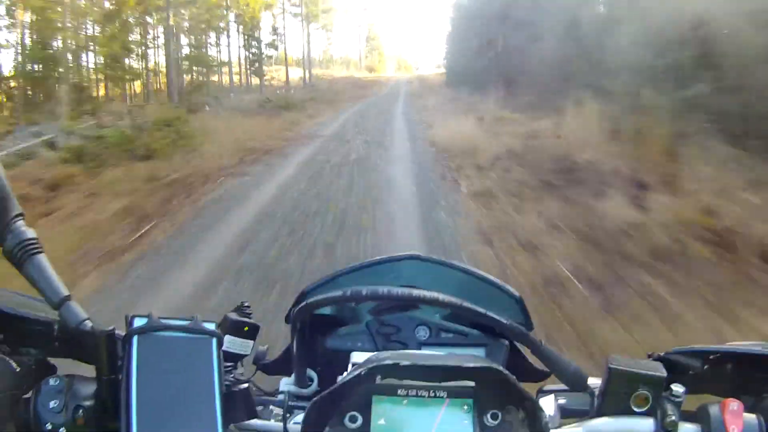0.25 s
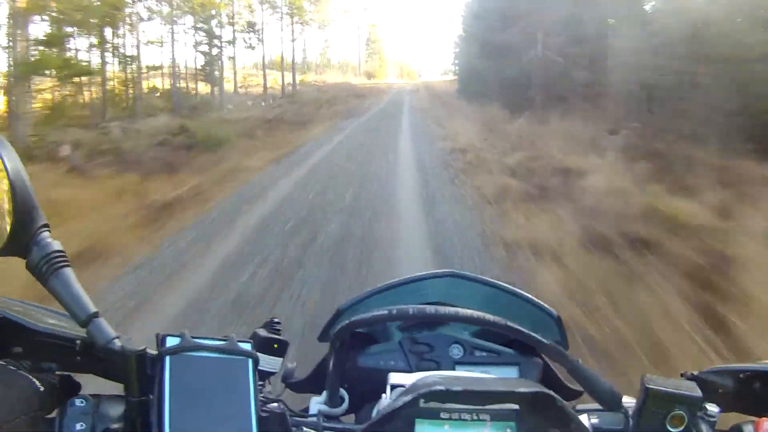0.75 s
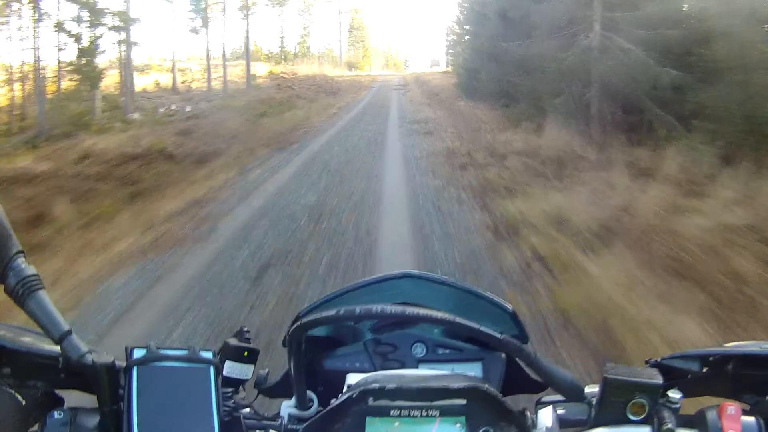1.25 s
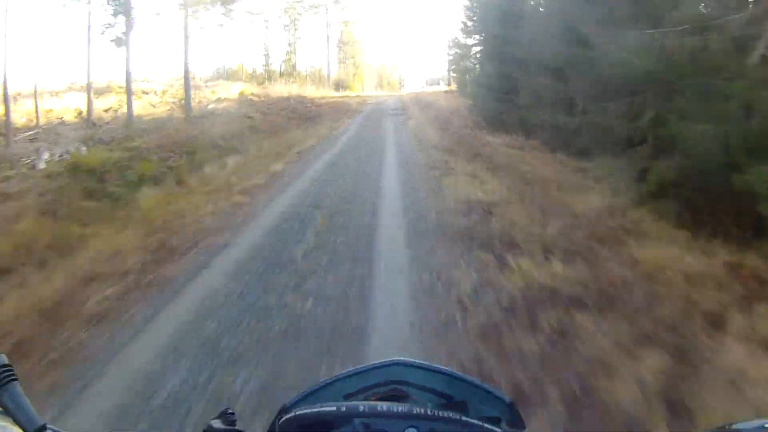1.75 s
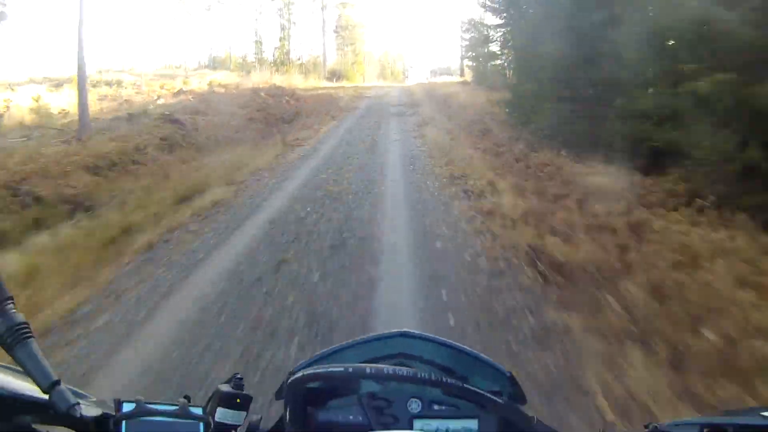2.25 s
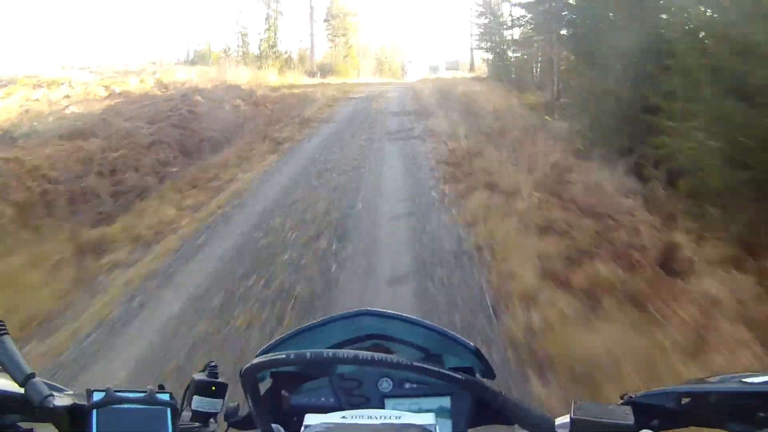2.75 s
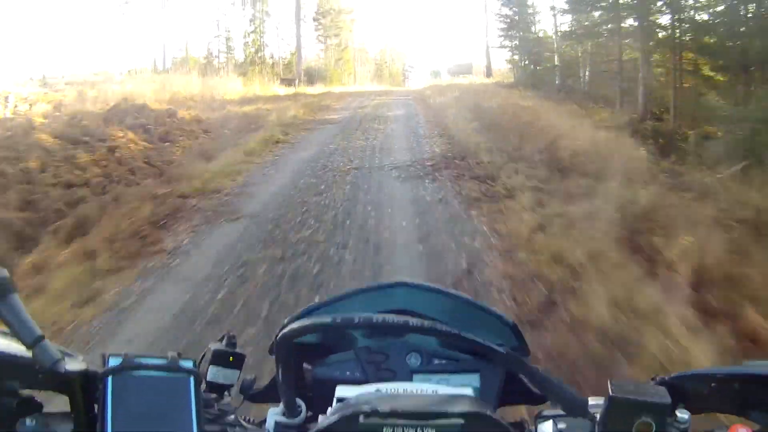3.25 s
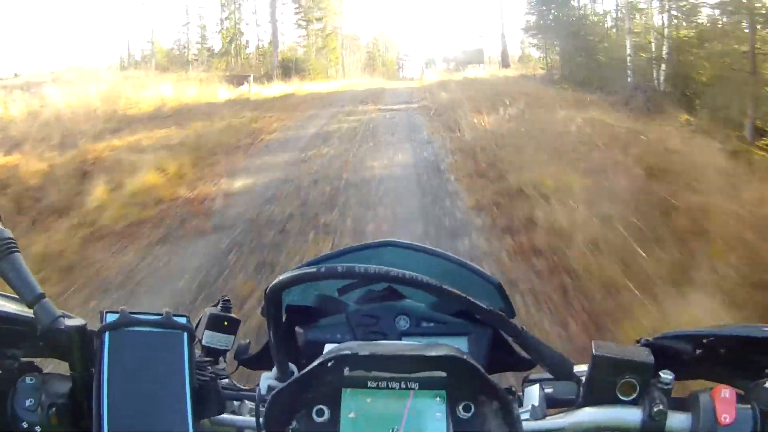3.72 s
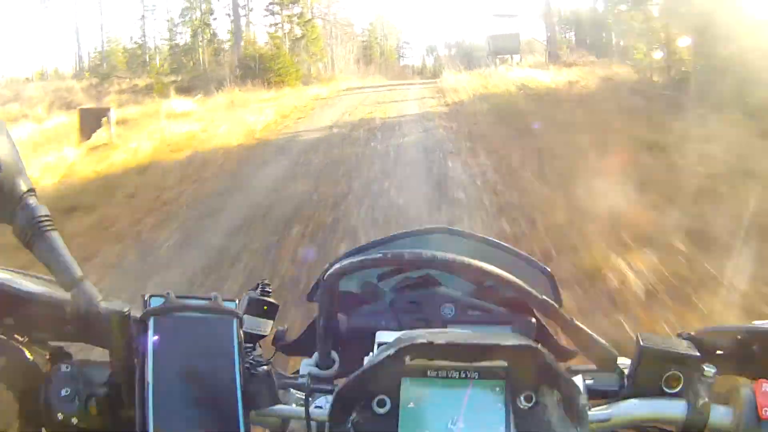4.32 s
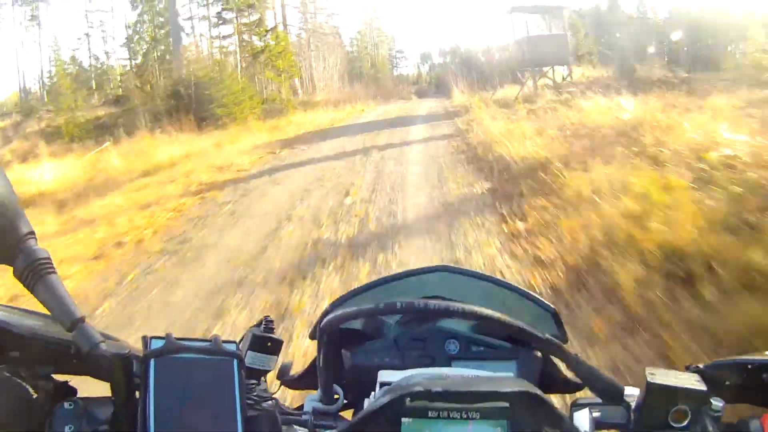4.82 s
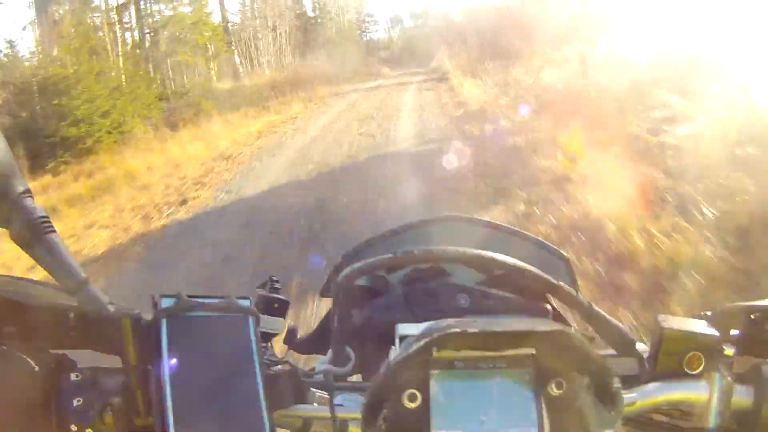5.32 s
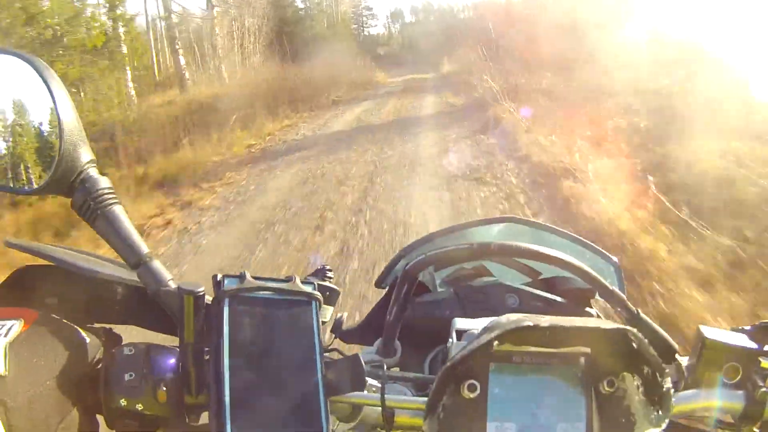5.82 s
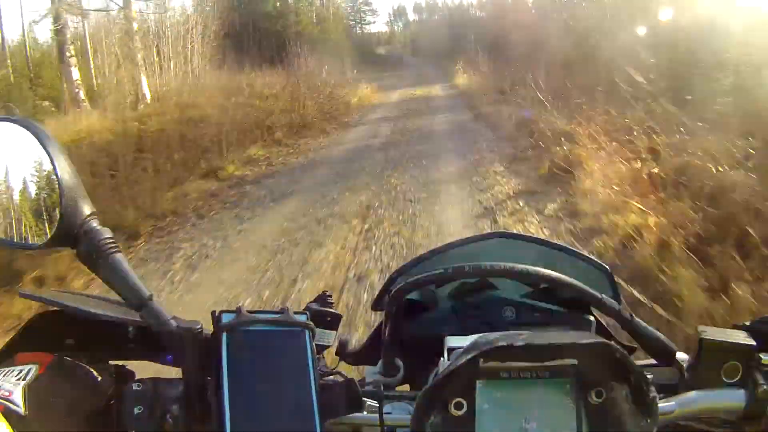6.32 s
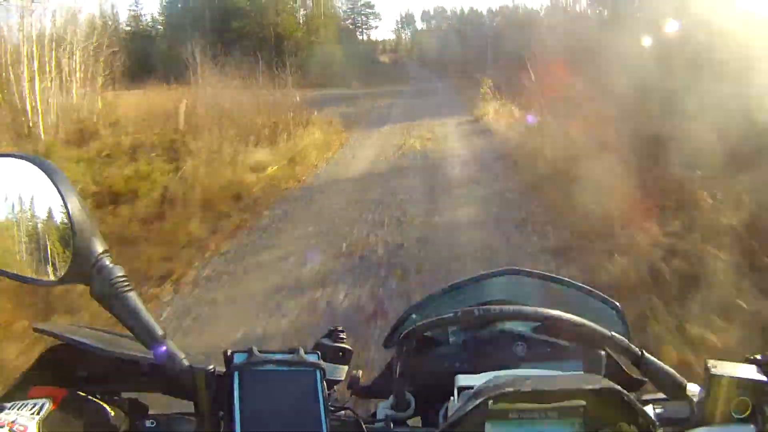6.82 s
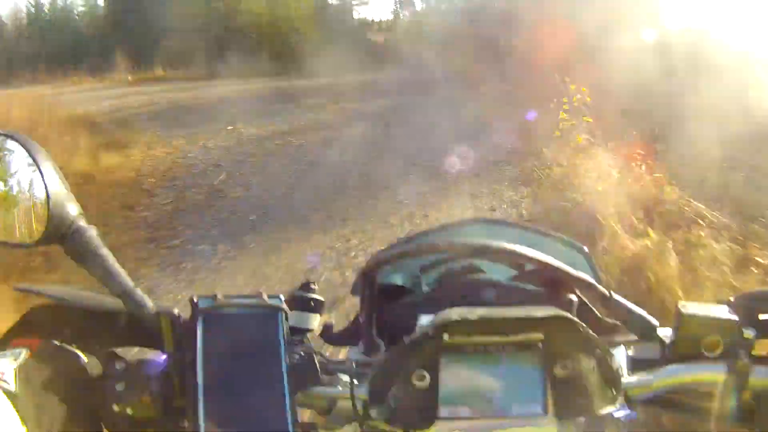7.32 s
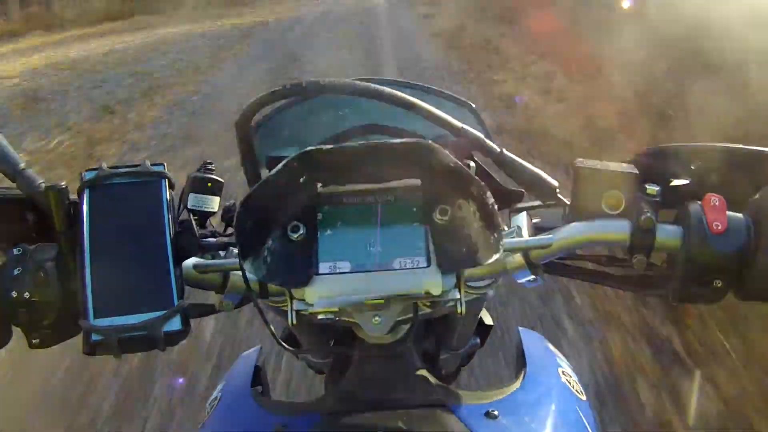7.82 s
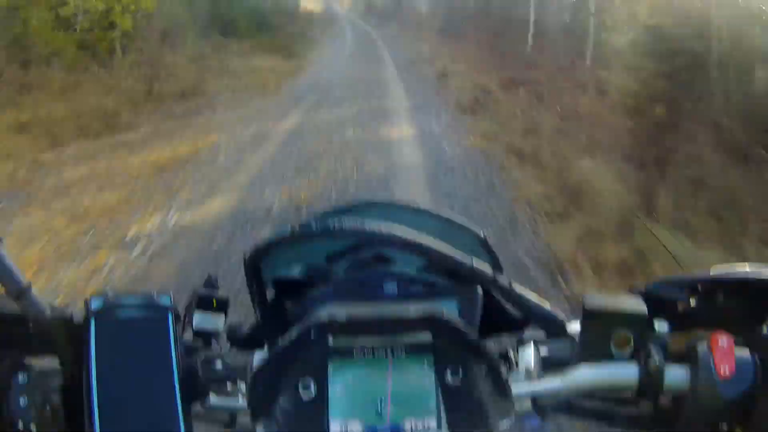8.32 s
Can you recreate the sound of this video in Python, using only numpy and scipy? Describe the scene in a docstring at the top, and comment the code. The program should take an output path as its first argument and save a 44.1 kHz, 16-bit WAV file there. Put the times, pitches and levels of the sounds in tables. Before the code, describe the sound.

A single-cylinder motorcycle thumps and clatters along a gravel track while wind buffets the microphone and a few sharp plastic clicks break through.

```python
"""A single-cylinder motorcycle thumps and clatters along a gravel forest road while wind buffets a plastic case.
The case holds a camera on the rider; its resonances hollow most sources, and a few sharp clicks strike it.
Exhaust pulses, crank hum, gated clatter and drive whine all follow one crank phase.
Wind, tyres and hiss are shaped noise; grit is random impulses.
Thuds are low wavering tones that swell and fade; clicks are decaying rings with noise cracks."""
import sys
import numpy as np
from scipy import signal
from scipy.fft import rfft, irfft
from scipy.io import wavfile
from scipy.ndimage import uniform_filter1d

SR = 44100
rng = np.random.default_rng(int(sys.argv[2]) if len(sys.argv) > 2 else 0)


def unload_audio(sound):
    """Save the sound as a 16-bit wav file, at the path given as the first command line argument."""
    columns = np.transpose(np.atleast_2d(sound))
    # keep every value between -1 and 1, then stretch to whole-number steps
    steps = np.round(np.clip(columns, -1, 1) * 32767)
    wavfile.write(sys.argv[1], SR, steps.astype(np.int16))


N = 377496
TIME = np.arange(N) / SR  # s
FREQ = np.fft.rfftfreq(N, 1 / SR) + 1e-3  # Hz, kept above zero for the logarithms


def undb(db):
    """Decibels to gain."""
    return 10 ** (np.asarray(db) / 20)


def unit(x):
    """Scale to rms 1."""
    return x / np.sqrt(np.mean(x ** 2))


def curve(table):
    """Interpolate (start_s, value) points, sample by sample."""
    return np.interp(TIME, *np.transpose(table))


def walk(rate_hz):
    """Low-passed random motion with spread 1."""
    lowpass = np.exp(-(FREQ / rate_hz) ** 2)
    return unit(irfft(rfft(rng.standard_normal(N)) * lowpass, N))


def grains(per_second, spread_db):
    """Random impacts of either sign, mostly small and a few large."""
    hit = rng.random(N) < per_second / SR
    size = np.minimum(rng.exponential(size=N), 5)
    sign = np.sign(rng.standard_normal(N))
    return unit(hit * undb(spread_db * size) * sign)


# resonances of the plastic case: centre_hz, width_hz, lift_db
CASE_RESONANCES = [(443, 53, 8.5), (603.5, 47, 9), (853, 63, 5), (1525, 157, 6.5), (2207, 386, 8),
                   (2537, 253, 7), (3424, 59, 5), (4385, 170, 3), (5885, 220, 4), (7840, 320, 4.5),
                   (9840, 220, 4)]


def through_case(x, spectrum):
    """Source spectrum plus case resonances, as a minimum-phase filter so that knocks ring afterwards."""
    hz, db = np.transpose(spectrum)
    response_db = np.interp(np.log(FREQ), np.log(hz), db)
    # 10 dB per octave fall above the last point
    response_db = response_db - 10 * np.log2(np.maximum(FREQ / hz[-1], 1))
    for centre_hz, width_hz, lift_db in CASE_RESONANCES:
        response_db = response_db + lift_db / (1 + (2 * (FREQ - centre_hz) / width_hz) ** 2)
    # folded cepstrum gives the minimum phase
    cepstrum = irfft(np.log(undb(response_db)), N)
    cepstrum[1:N // 2] *= 2
    cepstrum[N // 2 + 1:] = 0
    return irfft(rfft(x) * np.exp(rfft(cepstrum)), N)


def eddies(spectrum):
    """Turbulent air on the case: noise held at an even level, so that the flow and gust curves set its swells."""
    air = through_case(rng.standard_normal(N), spectrum)
    return air / np.sqrt(uniform_filter1d(air ** 2, size=5000))


# high hiss shape, before the case: freq_hz, density_db
HISS_SPECTRUM = [(3000, -8), (7000, -6), (8600, 4), (10100, 0.5), (11500, 0), (13000, 0.5), (16000, -4)]


def air_hiss(hiss_db=-59.5, follow_db_per_db=0.4):
    """Faint high noise, a little stronger where the gravel is louder."""
    gravel_db = curve(GRAVEL_LEVEL)
    level_db = hiss_db + follow_db_per_db * (gravel_db - gravel_db.mean())
    return unit(through_case(rng.standard_normal(N), HISS_SPECTRUM)) * undb(level_db)


# wind shapes, before the case: freq_hz, density_db
BUFFET_SPECTRUM = [(60, -29), (150, -12.5), (185, -8.5), (220, -1), (268, 0), (310, -10), (400, -19),
                   (520, -32), (900, -55)]
RUMBLE_SPECTRUM = [(15, -31), (27, -5), (48, -3), (66, -9), (84, -6.5), (102, 3.5), (135, -2.5),
                   (175, -6.5), (260, -22), (600, -50.5)]
RUSH_SPECTRUM = [(250, -9), (450, -4.5), (800, 2.5), (1050, -2.5), (1300, -8.5), (2000, -15.5), (3000, -19),
                 (8000, -54)]
# air stream strength re cruising: start_s, flow_db
AIRFLOW_LEVEL = [(0, 1.1), (1.85, 1.5), (2.1, -1.1), (2.75, -4.5), (3.45, -2.1), (4.05, -2.5), (4.9, -1),
                 (5.3, 3), (5.55, 2.5), (5.75, -0.5), (7.2, 0), (7.7, 4.5), (8.1, 1), (8.56, 2)]
# strongest gusts, lifting the buffeting: peak_s, lift_db
GUST_PEAKS = [(3.38, 4), (4.48, 4.5), (5.93, 2.5), (6.221, 3.5), (6.95, 4.5), (8.41, 5)]
GUST_S = 0.057  # time to swell, and to die away
SWELL_HZ, SWELL_DB = 3.8, 0.24  # lesser gusts, at random
RUSH_POWER = 1.45  # exponent of road speed


def wind(buffet_db=-26.0, rumble_db=-30.5, rush_db=-38.0, rumble_follow=.5, rush_follow=0.45,
         rush_load=0.068, flutter_db=1.0, surge_db=1.0):
    """Air stream buffets the case, rumbles and rushes round it; all grow with the flow and flutter together."""
    flow_db = curve(AIRFLOW_LEVEL)
    gust_db = SWELL_DB * walk(SWELL_HZ)
    for peak_s, lift_db in GUST_PEAKS:
        gust_db = gust_db + lift_db * np.exp(-((TIME - peak_s) / GUST_S) ** 2)
    buffet = eddies(BUFFET_SPECTRUM) * undb(buffet_db + flow_db + gust_db)
    surge = surge_db * walk(SWELL_HZ)
    rumble = eddies(RUMBLE_SPECTRUM) * undb(rumble_db + rumble_follow * flow_db + surge)
    # the rush also rises with road speed and with the air that the engine draws
    crank_hz = curve(CRANK_SPEED)
    speed = crank_hz / crank_hz.mean()
    rush_level_db = rush_db + rush_follow * flow_db + rush_load * curve(ENGINE_LOAD)
    rush = eddies(RUSH_SPECTRUM) * speed ** RUSH_POWER * undb(rush_level_db)
    return (buffet + rumble + rush) * undb(flutter_db * walk(26))


# low wind thuds: peak_s, level_db, pitch_hz (mean), length_s (to 1/e each side)
WIND_THUDS = [(0.275, -29, 100, .07), (1.376, -21.5, 104.7, 0.048), (1.898, -29.5, 180.7, 0.16),
              (3.87, -31, 88, 0.11), (4.86, -32.5, 100.2, 0.059), (7.419, -28, 85.1, 0.17),
              (7.684, -25, 90, 0.044), (7.864, -27, 160, 0.36), (8.236, -27, 62, 0.039)]


def thuds():
    """Big single eddies push the case: low tones of wavering pitch that swell and fade."""
    total = np.zeros(N)
    for peak_s, level_db, pitch_hz, length_s in WIND_THUDS:
        swell = np.exp(-((TIME - peak_s) / length_s) ** 2)
        wavering_hz = pitch_hz * (1 + 0.1163 * walk(34.5))
        tone = np.sqrt(2) * np.sin(2 * np.pi * np.cumsum(wavering_hz) / SR)
        total += undb(level_db) * swell * tone
    return total


# tyre noise and stone shapes, before the case: freq_hz, density_db
TYRE_SPECTRUM = [(1000, -16), (2200, -2), (2700, -3), (3100, -14.5), (3800, -8.5), (4400, 3), (5200, 0),
                 (6100, -2.5), (6800, -11), (8500, -28.5), (10500, -20), (11500, -34)]
GRIT_SPECTRUM = [(1000, -12.5), (2300, -3.5), (3100, -11), (4500, 0.5), (6000, -4), (7500, -16),
                 (11000, -38)]
# tyre level as the gravel changes, before trim_db: start_s, level_db
GRAVEL_LEVEL = [(0, -37.5), (1.1, -36), (1.28, -39.5), (1.75, -38), (2.15, -39.5), (2.45, -43), (2.56, -40),
                (3.55, -37.5), (3.9, -40), (5, -39), (7.7, -37), (8.56, -37)]


def tyres(trim_db=1, grit_db=-9, bumps_db=0.98):
    """Knobbly tyres grind the gravel: dense hiss with single stones ticking in it."""
    grind = unit(through_case(rng.standard_normal(N), TYRE_SPECTRUM))
    stones = unit(through_case(grains(900, 3.5), GRIT_SPECTRUM)) * undb(grit_db)
    return (grind + stones) * undb(curve(GRAVEL_LEVEL) + trim_db + bumps_db * walk(57))


# crack shape, before the case: freq_hz, density_db
CRACK_SPECTRUM = [(1000, -18), (3500, -12), (4700, 0), (6000, -4), (7500, -14), (12000, -20), (16000, -28)]
# taps: start_s, level_db (ring peak), pitch_hz, decay_s, crack_share (before crack_db), snap_share
CASE_CLICKS = [(3.620, -34, 5000, .003, .5, .05), (6.3214, -30, 5200, .002, .6, .02),
               (6.3315, -21, 5000, .0018, .6, .02), (6.3365, -24, 5600, .003, .7, .02),
               (6.3482, -11.5, 4950, .0017, .5, .025), (6.3507, -20, 4700, .0015, .8, .04),
               (7.6207, -11.5, 4500, .0012, .45, .17)]


def clicks(crack_db=8):
    """Hard taps on the plastic: a decaying ring with white snap, plus a noise crack through the case."""
    direct, cracks = np.zeros(N), np.zeros(N)
    t = TIME[:SR // 20]
    for start_s, level_db, pitch_hz, decay_s, crack_share, snap_share in CASE_CLICKS:
        start = int(start_s * SR)
        span = slice(start, start + len(t))
        fade = undb(level_db) * np.exp(-t / decay_s)
        ring = np.sin(2 * np.pi * pitch_hz * t)
        snap = snap_share * rng.standard_normal(len(t))
        direct[span] += fade * (ring + snap)
        cracks[span] += fade * crack_share * rng.standard_normal(len(t))
    return direct + undb(crack_db) * through_case(cracks, CRACK_SPECTRUM)


# crank speed: start_s, crank_hz (turns per second)
CRANK_SPEED = [(.9, 56.3), (1.35, 53.4), (2.35, 50.1), (3.55, 52.08), (4.3, 50.1), (5.2, 49), (5.8, 49.3),
               (6.5, 51.02), (8.56, 53.35)]
# throttle, eased off twice and then opened: start_s, load_db (re cruising)
ENGINE_LOAD = [(.9, 1), (1.3, -3), (2.3, -3), (2.65, -14), (3.2, -7), (3.55, 2), (3.8, -9.5), (4.25, -6),
               (4.5, 0.5), (7.25, 3), (7.6, 7), (8.3, 6.5), (8.56, -1.5)]
# crank hum: start_s, level_db
HUM_LEVEL = [(.9, -52), (1.35, -32), (1.8, -45), (2.15, -31), (2.8, -39.5), (4.4, -36), (6, -41.5),
             (7.6, -36.5), (8.56, -48)]
# engine shapes, before the case: freq_hz, density_db
EXHAUST_SPECTRUM = [(15, -16), (26, 9.5), (60, 1.5), (105, 10), (160, -4), (250, 3.5), (350, -19.5),
                    (900, -27.5), (2000, -45)]
CLATTER_SPECTRUM = [(700, -20), (1500, -9.5), (2200, -3), (2650, 3.5), (3100, -10.5), (4100, 1.5),
                    (5500, -9.5), (7000, -27), (8000, -20), (11000, -37)]


def engine(scatter_db=4.0, exhaust_db=-35.0, exhaust_follow=.3, clatter_db=-41.5, knock_cycles=0.31,
           steady_rattle=2.2, whine_db=-47, whine_swing_db=6, whine_slack=.7, waver_db=1.5):
    """Four-stroke single: a firing every two turns, crank hum, clatter after each firing and gear whine."""
    load_db = curve(ENGINE_LOAD)
    turns = np.cumsum(curve(CRANK_SPEED)) / SR
    cycle = (turns / 2).astype(int)
    strength = undb(scatter_db * rng.standard_normal(N))[cycle]  # one draw per firing
    firings = np.diff(cycle, prepend=0) * strength
    exhaust_level_db = exhaust_db + exhaust_follow * load_db
    exhaust = unit(through_case(firings, EXHAUST_SPECTRUM)) * undb(exhaust_level_db)
    hum = np.sin(2 * np.pi * turns) * np.sqrt(2) * undb(curve(HUM_LEVEL))
    # piston and valves knock with each firing over the steady chain rattle
    knocks = steady_rattle + strength * np.exp(-(turns / 2 % 1) / knock_cycles)
    clatter = unit(through_case(knocks * grains(12000, 1.2), CLATTER_SPECTRUM))
    clatter = clatter * undb(clatter_db + load_db)
    # drive teeth mesh 13 times per firing, louder as the throttle closes
    mesh = np.sin(13 * np.pi * turns) * np.sqrt(2)
    swing_db = whine_swing_db * np.tanh(whine_slack * load_db)
    whine = mesh * undb(whine_db - swing_db + waver_db * walk(7.6))
    return exhaust + hum + clatter + whine


def scene():
    """All sources ride along with the microphone, in the open air: a plain sum, one channel."""
    return (air_hiss() + wind() + thuds() + tyres() + clicks() + engine())[None]


TOP_HZ = 15750  # passband edge


def record(dry):
    """The camera cuts the top of the treble with a steep elliptic low-pass."""
    lowpass = signal.ellip(10, .1, 80, TOP_HZ, fs=SR, output="sos")
    return signal.sosfilt(lowpass, dry)


dry = scene()
out = record(dry)
unload_audio(out)
```